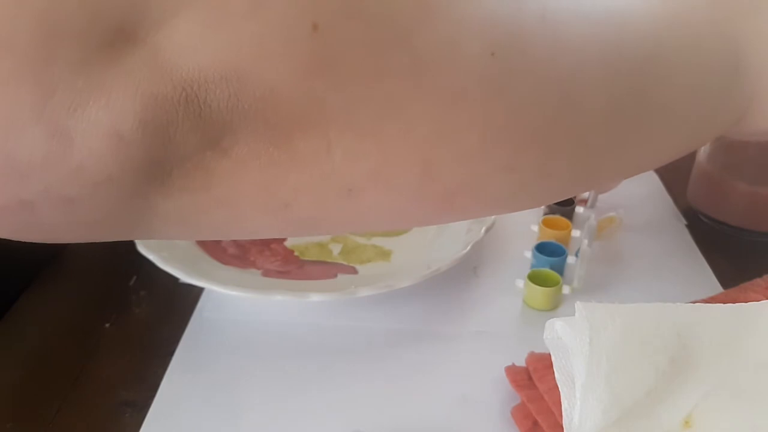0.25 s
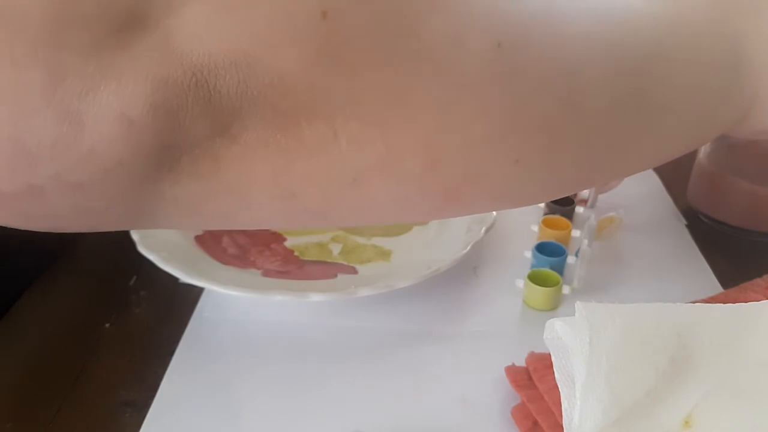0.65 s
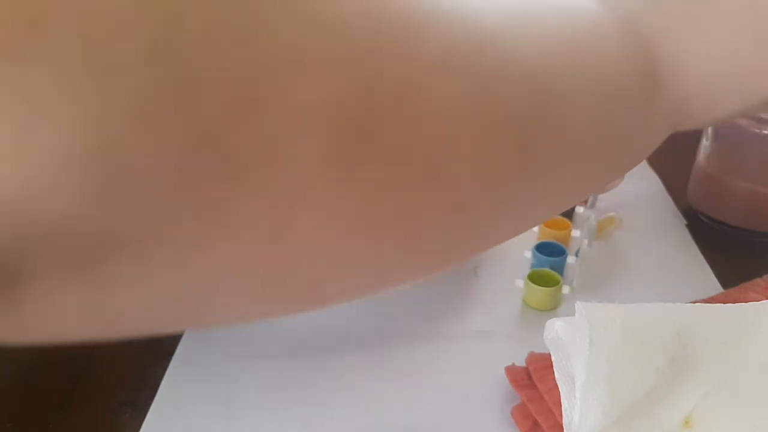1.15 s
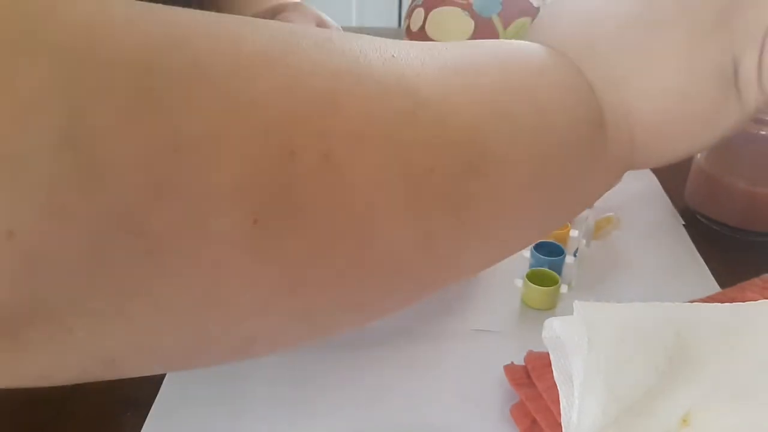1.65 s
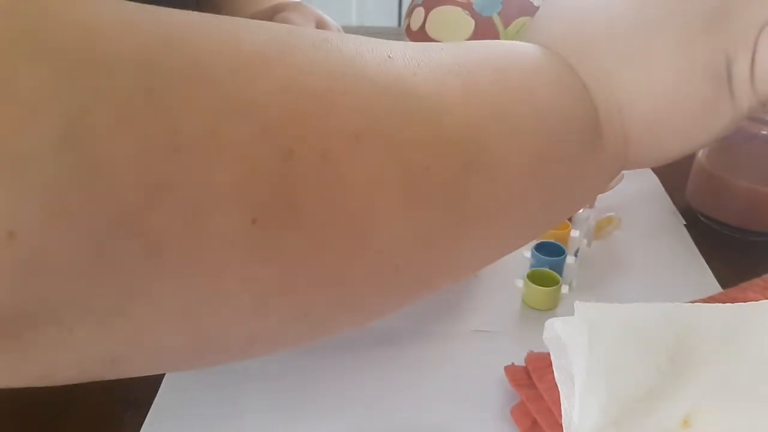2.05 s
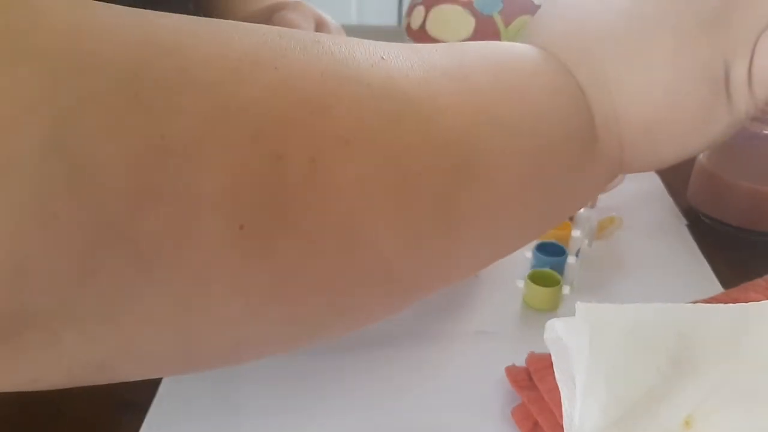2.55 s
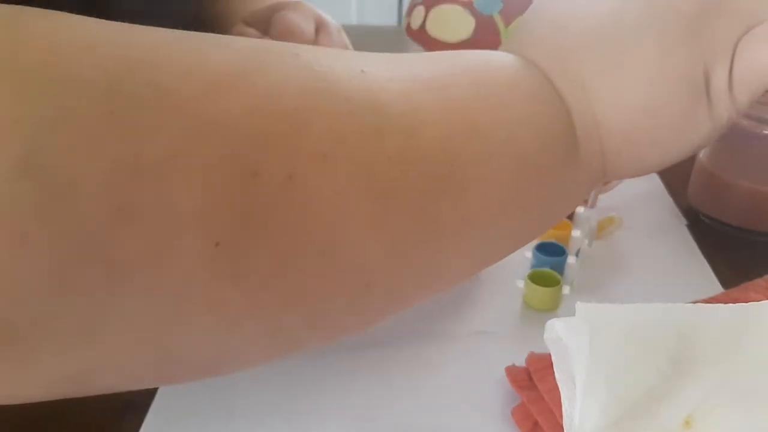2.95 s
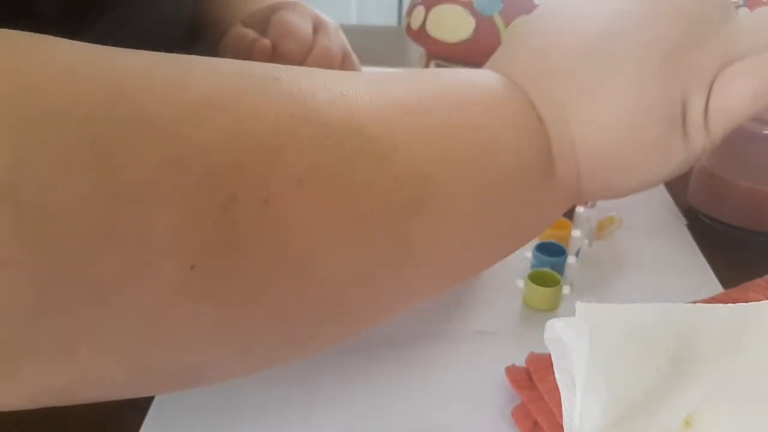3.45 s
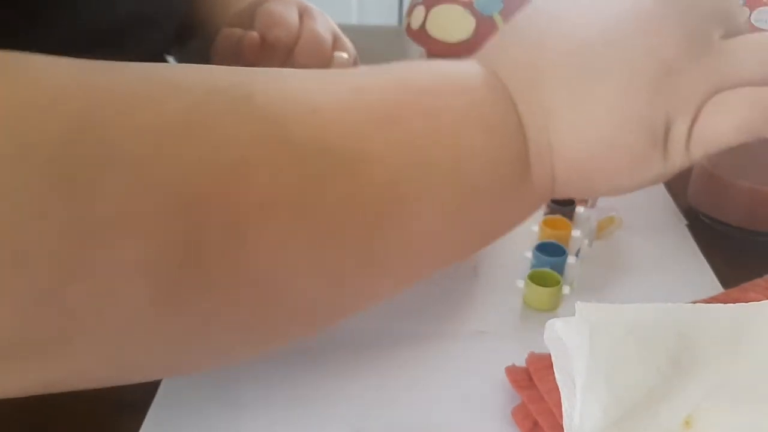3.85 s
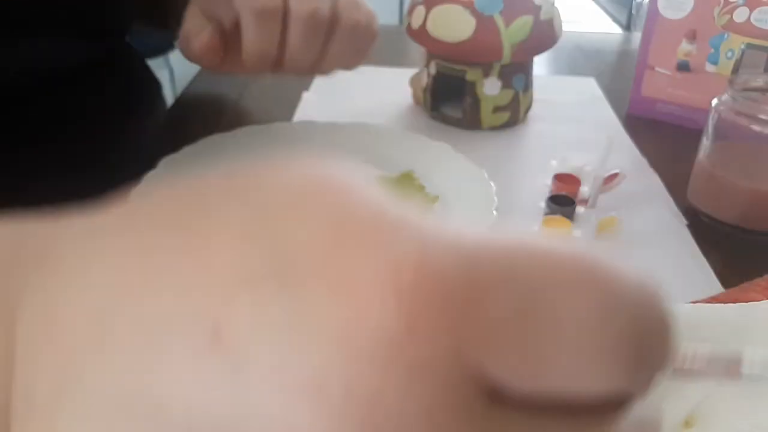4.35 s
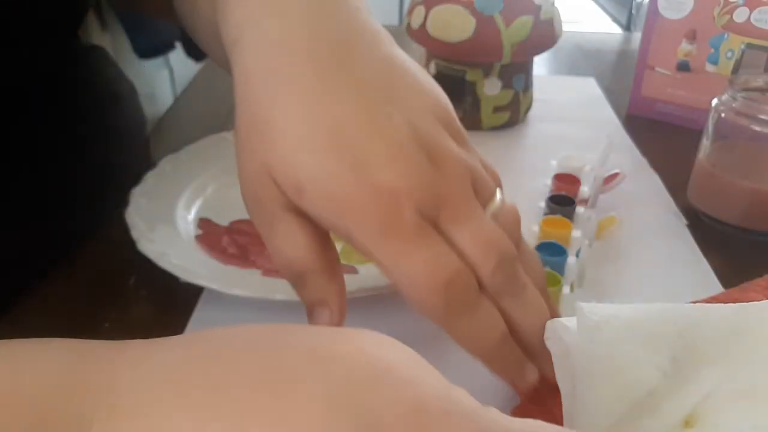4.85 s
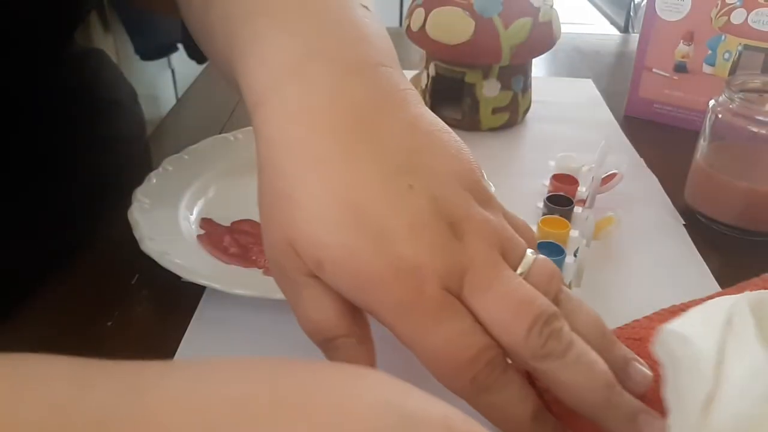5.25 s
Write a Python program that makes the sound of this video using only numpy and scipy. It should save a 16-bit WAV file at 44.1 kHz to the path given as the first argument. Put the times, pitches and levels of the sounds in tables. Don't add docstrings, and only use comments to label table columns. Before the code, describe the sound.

A brush swishes faintly in a glass jar, taps its rim six times with bright clinks, then table thuds, a juddering scrape and paper rustle.

```python
import sys
import numpy as np
from scipy import signal
from scipy.fft import rfft, irfft
from scipy.io import wavfile
from scipy.ndimage import uniform_filter1d

SR = 44100
rng = np.random.default_rng(int(sys.argv[2]) if len(sys.argv) > 2 else 0)


def boost_factor(decibels):
    exponent = np.asarray(decibels, float) / 20
    return 10 ** exponent


def bounce(signal):
    frames = np.transpose(np.atleast_2d(signal))
    limited = np.clip(frames, -1, 1)
    pcm = np.round(limited * 32767).astype(np.int16)
    wavfile.write(sys.argv[1], SR, pcm)


N = 242753
T = np.arange(N) / SR

# frequency in Hz, density in dB per Hz.
HUM_SPECTRUM = [(12, -37), (20, -22), (101, -2), (134, -4), (168, -3), (204, -7.5), (319, -11), (357, -8.5),
                (399, -16), (558, -18.5), (780, -30.5), (1190, -30), (1530, -35), (13200, -38.5),
                (16000, -41.5)]
HUM_DB, MURMUR_DB = -61.5, -5.5
# peak in seconds, level above rest in dB, rise in s, fall in s.
MURMUR_SWELLS = [(.45, 4.5, .2, 1), (2.05, 4.5, 0.17, .1), (3.2, 6.5, 0.24, 0.35), (3.6, 10, 0.059, 0.21),
                 (4.03, 14, 0.13, 0.027), (4.2, 11, 0.057, 0.36)]
# frequency in Hz, density in dB per Hz.
HISS_SPECTRUM = [(12, -51), (20, -10), (107, 2.5), (216, -5.5), (328, 0), (780, -2.5), (3340, -0.5),
                 (14700, 1), (16000, -26)]

# start in seconds, peak in dB, pitch in Hz, ring of the wet glass in dB.
WET_TICKS = [(0.0126, -56.5, 3140, -0.5), (0.0127, -54, 1550, -28), (0.012, -64, 6000, -20),
             (0.061, -61, 1850, -3), (0.168, -55, 2480, -7), (0.1685, -63, 5540, -18),
             (0.175, -58, 3790, -15), (0.192, -52.5, 2400, -24), (0.19, -62, 4060, -20),
             (0.1944, -67, 5140, -20), (0.2532, -38, 3040, -7.5), (0.2578, -52.5, 3850, -11),
             (0.2932, -57, 3160, -17), (0.3704, -57, 2990, -5), (0.3765, -63, 2160, -22),
             (0.383, -62, 4090, -23), (0.413, -65, 3260, -7), (0.4366, -67, 3980, -4),
             (0.4528, -41.5, 3110, -25), (0.5094, -72, 3070, -21.5), (0.567, -65, 3040, -4.5),
             (0.58, -63.5, 3780, -12), (0.58, -66, 1790, -25), (0.6307, -63.5, 4040, 5),
             (0.6514, -68, 6100, -15), (0.7652, -65, 1370, -13)]
# pitch in Hz, T60 in s.
WET_NOTE_T60 = [(1500, 0.034), (2400, 0.034), (3100, 0.035), (3750, 0.032), (4050, 0.077), (5500, 0.028)]
# frequency in Hz, level in dB, T60 in s.
WET_JAR_MODES = [(1520, -4.5, 0.043), (2020, -10, .08), (2740, -14, 0.048), (3110, -6, 0.1),
                 (3180, -1.5, 0.18), (3500, -5, 0.076), (3850, -8, 0.11), (4200, -11, 0.17)]
# start in seconds, peak in dB, centre in Hz, burst in ms.
SOFT_SLAPS = [(0.014, -60, 1310, 18), (0.164, -67, 3500, 48), (0.19, -56.5, 2200, 21),
              (0.254, -59.5, 1590, 14), (.578, -72, 2200, 40), (.762, -67, 2500, 11), (2.64, -72, 1190, 45),
              (3.583, -68, 3000, 7.6), (3.644, -65, 2500, 4.9), (3.8475, -53, 1670, 22),
              (3.849, -41, 700, 35), (4.3505, -48, 530, 47), (4.90, -67, 3050, 5.5)]

# start in seconds, peak in dB, middle modes in dB, top modes in dB,
# lean from the 6 kHz to the 5 kHz modes in dB.
RIM_TAPS = [
    (1.4687, -30, -19, -7, 2),
    (1.9159, -32, -10.5, 1, 5.5),
    (2.107, -31.5, -18.5, -8, 1),
    (2.4133, -33, -24, -2, 13),
    (3.0088, -37.5, -23, -3, 9.5),
    (3.4285, -40.5, -10.5, 2.5, -5.5),
]
BRISTLE_TOUCH_MS = [47, 34, 36, 66, 72, 46]
# frequency in Hz, share of the lean.
MODE_LEAN = [(5300, 1), (6200, -1), (6600, -1), (6750, 0)]
# frequency in Hz, level in dB, T60 in s, sign and size.
LOW_WALL_MODES = [(3250, 2.5, 0.29, 0.78), (3195, -47, .2, 0.77), (3650, -30, 0.081, -1),
                  (3509, -15.5, 0.097, 0.87), (3070, -25, 0.18, 1), (3440, -29, 0.051, 1),
                  (3790, -32, .08, 1), (2230, -38, 0.025, -0.069)]
# frequency in Hz, level in dB, T60 in s, sign and size.
MID_WALL_MODES = [(5014, 1, 0.089, 0.54), (4840, -14, 0.069, 0.6), (5205, -23, 0.27, 0.86),
                  (6270, -10.5, 0.26, 1), (6470, -7, 0.14, 0.9), (6600, -39, .08, 1),
                  (6760, -8, 0.16, 0.69), (6975, -8.5, 0.13, 0.76), (7080, -12, 0.29, 1), (6960, 0, 0.2, 1)]
# frequency in Hz, level in dB, T60 in s, sign and size.
TOP_WALL_MODES = [(8430, -4, .16, 1), (8470, -10, .15, 1), (8410, -17, .1, -1), (10652, -3, .125, 1),
                  (10690, -2, .115, -1), (8830, -24, .1, 1), (9904, -16, .11, 1), (10150, -24, .1, 1),
                  (10380, -26, .1, 1), (11480, -26, .1, 1)]
# frequency in Hz, level in dB, T60 in s, sign and size.
FOOT_MODES = [(170, 23.5, 0.29, 0.057), (240, -4, 0.29, -0.7), (331.8, 11.5, 0.27, 0.59),
              (542.3, -8, 0.25, -1.43), (599, -1.5, 0.16, 1), (1126, 5, 0.044, 0.72)]
TOP_FROM_HZ, SHOULDER_DB = 9000, -3
DAMP_DB, DAMP_DB_PER_MS, REBOUND_DB, UPPER_SHARE = -.5, -.19, 3.5, .35

# deepest swing in seconds, peak in dB, thud pitch in Hz, its T60 in s,
# ring of the top in dB.
TABLE_BLOWS = [
    (3.105, -56, 228, 0.069, 1.5),
    (3.124, -52.5, 200, .05, -8),
    (3.5625, -23.5, 199.4, 0.026, -7),
    (3.856, -30.5, 200.2, 0.063, -3.5),
    (3.919, -41, 170, 0.017, -3.5),
    (4.168, -40, 200, 0.089, -3),
    (4.3557, -43.5, 240, 0.023, -8),
    (4.366, -39.5, 219, 0.18, -9),
]
# frequency in Hz, level in dB, T60 in s.
TABLE_MODES = [(106.8, 0.5, 0.13), (143.3, -5, 0.29), (184, -3, 0.39), (228.2, -8.5, 0.32),
               (310, -12.5, 0.33), (345.8, 3.5, 0.14), (393.5, -2.5, 0.15), (437, -1, 0.068),
               (514, -6.5, 0.13), (603, -2, 0.074), (700, -7.5, 0.089), (853, -15, 0.086), (1131, 3, 0.071),
               (1297, 5.5, 0.041), (2160, -9, 0.099)]
SOFT_HZ, SOFT_DB, DB_PER_OCTAVE = 396, -49.5, 20.5
# start in seconds, peak in dB, centre in Hz.
HARD_EDGES = [(3.5554, -23.5, 3610), (3.5553, -27.5, 6550), (3.556, -30, 2340), (3.562, -40, 1130),
              (3.567, -40, 4850), (3.8476, -48, 2350), (3.849, -50, 950), (4.351, -53, 890),
              (5.2759, -62, 6980)]

# time in seconds, level in dB.
SCRAPE_LEVEL = [(3.93, -89), (3.97, -71), (4.05, -76), (4.12, -68.5), (4.2, -72), (4.25, -70), (4.29, -87)]
# frequency in Hz, half-width in Hz, level in dB.
SLIDER_RESONANCES = [(1188, 21, 15), (1850, 98, -21), (2260, 32, -22), (2650, 44, -14), (2930, 140, -7.5)]
# start in seconds, peak in dB.
GRAIN_CATCHES = [(3.971, -63), (4.012, -66), (4.102, -58), (4.1376, -56), (4.149, -56), (4.166, -45.5),
                 (4.207, -44)]
# centre in Hz, level in dB, burst in ms, width in octaves.
CATCH_BURSTS = [(1930, -2, 6, .6), (1120, -6, 14, .8), (3700, -11, 9, 1.2)]
# deepest swing in seconds, peak in dB.
HOPS = [(3.974, -29.5), (4.020, -28), (4.063, -34), (4.105, -32.5)]

# peak in seconds, level in dB, rise in s, fall in s, crispness in dB.
TOWEL_STROKES = [
    (4.36, -88, 0.098, 0.12, 7),
    (4.651, -79.5, 0.072, 0.11, -3),
    (4.95, -76, 0.066, 0.055, -2.5),
    (5.08, -71, .02, 0.031, -6),
    (5.34, -78, 0.085, 0.051, -3),
    (5.42, -75.5, 0.038, 0.032, 2),
    (5.5, -77, 0.011, .02, -5),
]
# time in seconds, firing rate in Hz, level in dB.
ENGINE_COURSE = [(4.4, 69.3, -104), (4.48, 69.4, -67.5), (4.82, 69.8, -61), (4.88, 69.6, -62.5),
                 (4.92, 77.9, -67.5), (5.25, 79, -62.5), (5.4, 78, -66), (5.5, 78.6, -64.5)]
# multiple, cruising in dB, speeding up in dB, pulling in dB.
FIRING_ORDERS = [(2, -6, -9, -2), (3, -7, -14, -1), (4, -12, -1, -3), (5, -10, -14, -13),
                 (6, -13, -12, -15), (8, -3, -22, -22)]
SPEED_UP_S = (4.86, 4.93)
TAKE_LOAD_S = (5.3, 5.17)

ROOM_T60_S, ROOM_TOP_T60_S, ROOM_DB, ROOM_SPLIT_HZ = 0.27, 0.14, -11.5, 770
MIC_LOW_HZ, MIC_TOP_HZ = 88, 12050
MIC_LEAK_DB, MIC_PORT_HZ = -12, 14800


def level(x, db):
    return x * boost_factor(db) / np.sqrt(np.mean(x ** 2))


def curve(table):
    s, *columns = np.transpose(table)
    return [np.interp(T, s, c) for c in columns]


def add(out, s, x):
    i = int(s * SR)
    out[i:i + len(x)] += x[:N - i]


def ring(modes, scatter_db, dur=.45, detune=0.):
    t, m = T[:int(dur * SR)], np.array(modes, float)
    chance = rng.standard_normal((3, len(m)))
    sign = m[:, 3] if m.shape[1] > 3 else np.sign(chance[0])
    hz = m[:, 0] * (1 + detune * chance[1])
    gain = sign * boost_factor(m[:, 1] + scatter_db * chance[2])
    decay = boost_factor(-60 * t / m[:, 2:3])
    return gain @ (np.sin(2 * np.pi * hz[:, None] * t) * decay)


def lowpass(x, hz, order):
    return signal.sosfilt(signal.butter(order, hz, fs=SR, output="sos"), x)


def highpass(x, hz, order):
    return signal.sosfilt(signal.butter(order, hz, "high", fs=SR, output="sos"), x)


def band(x, hz, width_hz, order=1):
    lo = np.sqrt(hz ** 2 + width_hz ** 2 / 4) - width_hz / 2
    edges = [lo, min(lo + width_hz, .45 * SR)]
    return signal.sosfilt(signal.butter(order, edges, "band", fs=SR, output="sos"), x)


def noise_burst(t, decay_s):
    return rng.standard_normal(len(t)) * np.exp(-t / decay_s)


def coloured(spectrum):
    hz, db = np.transpose(spectrum)
    f = np.maximum(np.arange(N // 2 + 1) * SR / N, 1)
    gain = boost_factor(np.interp(np.log(f), np.log(hz), db))
    return irfft(rfft(rng.standard_normal(N)) * gain, N)


def walk(rate):
    k = int(SR / rate)
    steps = rng.standard_normal(N // k + 1)
    return 0.99 * uniform_filter1d(np.repeat(steps, k), k)[:N]


def grains(rate, spread_db):
    happens = rng.random(N) < rate / SR
    return happens * boost_factor(spread_db * rng.exponential(size=N)) * rng.choice([-1., 1.], N)


def hump(s, rise_s, fall_s):
    return np.exp(-.5 * ((T - s) / np.where(T < s, rise_s, fall_s)) ** 2)


def click(out, s, db, hz, burst_ms, octaves):
    t = T[:int(.15 * SR)]
    shape = t ** 0.21 * np.exp(-t * 1700 / burst_ms)
    burst = band(rng.standard_normal(len(t)) * shape, hz, hz * np.clip(octaves, .1, 3), order=2)
    add(out, s, boost_factor(db) * burst / abs(burst).max())


def blow(thuds, tops, s, db, hz, t60, top_db, hard_hz):
    t = T[:int(.45 * SR)]
    lead = 1.4 / hz
    u = t - lead
    shape = np.where(u < 0, np.exp(-(u * hz / 0.81) ** 2), boost_factor(-60 * u / t60))
    add(thuds, s - lead, -boost_factor(db) * shape * np.cos(2 * np.pi * hz * u))
    rattle = noise_burst(t, 0.024)
    top = (ring(TABLE_MODES, 2.9, detune=0.009) + boost_factor(11.5) * rattle) * (1 - np.exp(-t / 0.0033))
    add(tops, s - lead, boost_factor(db + top_db - 5) * lowpass(top, hard_hz, 2))


def hum():
    steady = coloured(HUM_SPECTRUM)
    swell_db = MURMUR_DB + sum(db * hump(s, rise_s, fall_s) for s, db, rise_s, fall_s in MURMUR_SWELLS)
    settle = np.clip((4.55 - T) / 0.18, 0, 1)
    bass = band(steady, 200, 500) * boost_factor(HUM_DB) / steady.std()
    return level(steady, HUM_DB) + (boost_factor(swell_db * settle + 0.27 * walk(5.6)) - 1) * bass


def swish():
    out, t = np.zeros(N), T[:int(.2 * SR)]
    for s, db, hz, jar_db in WET_TICKS:
        t60 = np.interp(hz, *np.transpose(WET_NOTE_T60))
        onset = 1 - np.exp(-(t / 0.0011) ** 2)
        note = np.sin(2 * np.pi * hz * t * (1 + 0.42 * t)) * boost_factor(-60 * t / t60) * onset
        splash = band(noise_burst(t, 0.0048), hz, 0.25 * hz)
        waver = boost_factor(4.9 * walk(124)[:len(t)])
        glass = ring(WET_JAR_MODES, 2.5, dur=.2, detune=0.0164) * waver
        add(out, s, boost_factor(db) * (note + boost_factor(-12) * splash + boost_factor(jar_db - 10.0) * glass))
    return out


def slaps():
    out = np.zeros(N)
    for s, db, hz, burst_ms in SOFT_SLAPS:
        click(out, s, db, hz, burst_ms, octaves=.95)
    return out


def taps():
    tone, noise, t = np.zeros(N), np.zeros(N), T[:int(.45 * SR)]
    for (s, db, mid_db, top_db, lean_db), touch_ms in zip(RIM_TAPS, BRISTLE_TOUCH_MS):
        since_touch = t - touch_ms / 1000
        touched = 1 / (1 + np.exp(np.clip(-since_touch / 0.0017, -50, 50)))
        damp_db = DAMP_DB + DAMP_DB_PER_MS * touch_ms
        rebound_db = REBOUND_DB * np.sin(np.pi * np.clip(since_touch / 0.08, 0, 1))

        mid = [(hz, m_db + lean_db * np.interp(hz, *np.transpose(MODE_LEAN)), *rest)
               for hz, m_db, *rest in MID_WALL_MODES]
        top = [(hz, m_db + (top_db if hz > TOP_FROM_HZ else SHOULDER_DB), *rest)
               for hz, m_db, *rest in TOP_WALL_MODES]
        waver = boost_factor(0.63 * walk(83)[:len(t)])
        low_ring = ring(LOW_WALL_MODES, 0.12) * boost_factor((damp_db + rebound_db) * touched)
        upper_ring = boost_factor(mid_db) * ring(mid, 0.66, detune=0.00032) + ring(top, 0.94)
        glass = low_ring + upper_ring * waver * boost_factor(UPPER_SHARE * damp_db * touched)

        foot_db = 0.21 * db + 0.36 * mid_db - 42.0
        foot_ring = ring(FOOT_MODES, 1.0, detune=0.018)
        swell = 1 - 0.88 * np.exp(-t / 0.0074)
        add(tone, s, (boost_factor(db + 1.5) * glass + boost_factor(foot_db) * foot_ring) * swell)

        tick = band(noise_burst(t, 0.0003), 2800, 12500)
        shiver = band(noise_burst(t, 0.01), 8070, 6000, order=2)
        foot = band(noise_burst(t, 0.048), 244, 220, order=2)
        clack = band(noise_burst(t, 0.014), 2970, 820, order=2)
        add(noise, s, boost_factor(db + mid_db + 2.0) * clack + boost_factor(db - 4.5) * tick
            + boost_factor(db + top_db - 10) * shiver + boost_factor(foot_db + 20) * foot)
    return tone, noise


def knocks():
    thuds, tops = np.zeros(N), np.zeros(N)
    for s, db, hz, t60, top_db in TABLE_BLOWS:
        hard_hz = SOFT_HZ * 2 ** ((db - SOFT_DB) / DB_PER_OCTAVE)
        blow(thuds, tops, s, db, hz, t60, top_db, hard_hz)
    return thuds, tops


def edges():
    out = np.zeros(N)
    for s, db, hz in HARD_EDGES:
        click(out, s, db, hz, burst_ms=1000 * 10.7 / hz, octaves=0.24)
    return out


def scrape():
    slips = grains(2000, 3.2) + 0.53 * rng.standard_normal(N)
    body = sum(boost_factor(db) * level(band(slips, hz, 2 * w), 10 * np.log10(w)) for hz, w, db in SLIDER_RESONANCES)
    grit = level(band(slips, 3400, 2600), -8.5)
    sliding = (T > SCRAPE_LEVEL[0][0]) & (T < SCRAPE_LEVEL[-1][0])
    return (level(body, 0.99) + grit) * boost_factor(curve(SCRAPE_LEVEL)[0]) * sliding


def catches():
    out = np.zeros(N)
    for s, db in GRAIN_CATCHES:
        for hz, part_db, burst_ms, octaves in CATCH_BURSTS:
            click(out, s, db + part_db, hz, burst_ms, octaves)
    return out


def judder():
    thuds, tops = np.zeros(N), np.zeros(N)
    for s, db in HOPS:
        blow(thuds, tops, s, db, hz=190.8, t60=0.0395, top_db=-8.5, hard_hz=403)
    return thuds, tops


def rustle():
    fibres = grains(3000, 1.4) * boost_factor(2.1 * walk(40))
    dull = level(band(fibres, 1420, 2000, order=2), 2.2)
    crisp = level(band(fibres, 3400, 3700, order=2), 1.1)
    return sum(boost_factor(db) * hump(s, rise_s, fall_s) * (dull + boost_factor(crisp_db) * crisp)
               for s, db, rise_s, fall_s, crisp_db in TOWEL_STROKES)


def engine():
    hz, db = curve(ENGINE_COURSE)
    phase = 2 * np.pi * np.cumsum(hz) / SR
    lines = np.zeros(N)
    for k, cruise_db, speeding_db, pulling_db in FIRING_ORDERS:
        order_db = np.interp(T, SPEED_UP_S + TAKE_LOAD_S, [cruise_db, speeding_db, speeding_db, pulling_db])
        lines += boost_factor(order_db + 3.9 * walk(16)) * np.sin(k * phase + 0.63 * walk(9))
    rumble = level(band(rng.standard_normal(N), 292, 310, order=3), -1.2)
    return (boost_factor(3.5) * lines + rumble) * boost_factor(db) * (T > ENGINE_COURSE[0][0])


def room(x):
    t = T[:int(.5 * SR)]
    noise = rng.standard_normal(len(t))
    low = lowpass(noise, ROOM_SPLIT_HZ, 1)
    tail = low * boost_factor(-60 * t / ROOM_T60_S) + (noise - low) * boost_factor(-60 * t / ROOM_TOP_T60_S)
    tail *= np.clip((t - .002) / 0.012, 0, 1)
    return x + boost_factor(ROOM_DB) * signal.fftconvolve(x, tail / np.sqrt(np.sum(tail ** 2)))[:N]


def microphone(x):
    x = highpass(x, MIC_LOW_HZ, 3)
    return lowpass(x, MIC_TOP_HZ, 10) + boost_factor(MIC_LEAK_DB) * band(x, MIC_PORT_HZ, 1800, order=4)


def scene():
    glass, ticks = taps()
    knock_thuds, knock_tops = knocks()
    hop_thuds, hop_tops = judder()
    contacts = slaps() + edges() + catches()
    in_room = ticks + knock_tops + hop_tops + swish() + contacts + scrape() + rustle()
    near = microphone(glass + room(in_room))
    thuds = highpass(knock_thuds + hop_thuds, .5 * MIC_LOW_HZ, 2)
    mid = near + thuds + engine() + hum()
    return np.array([mid, mid])


def roll_off(x):
    return signal.sosfilt(signal.butter(12, 16380, fs=SR, output="sos"), x)


def record(dry):
    side = level(coloured(HISS_SPECTRUM), -80)
    return roll_off(dry + np.array([side, -side]))


dry = scene()
out = record(dry)
bounce(out)
```